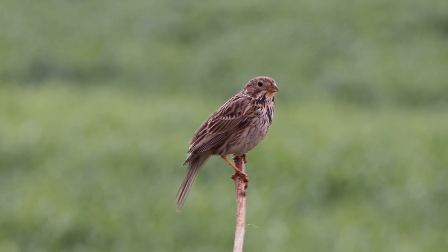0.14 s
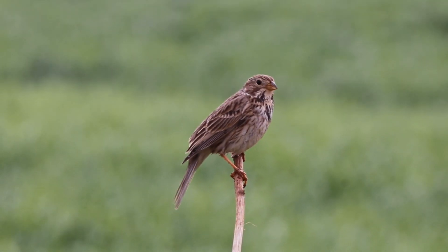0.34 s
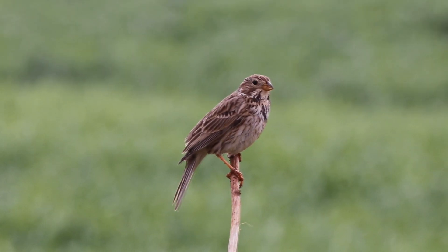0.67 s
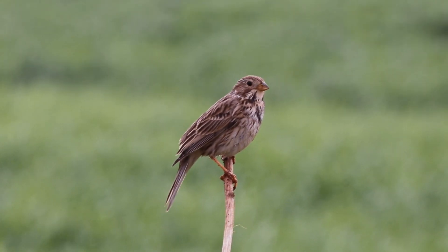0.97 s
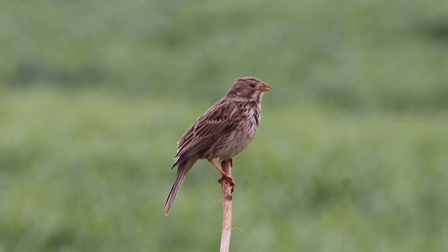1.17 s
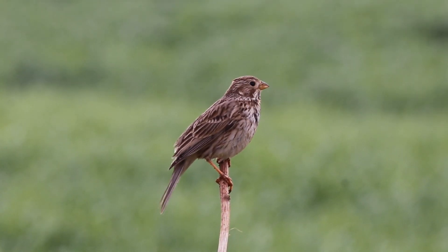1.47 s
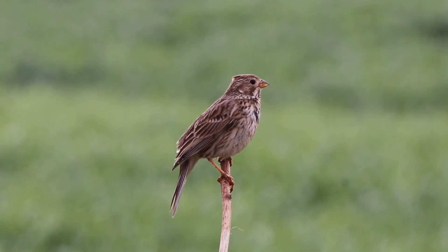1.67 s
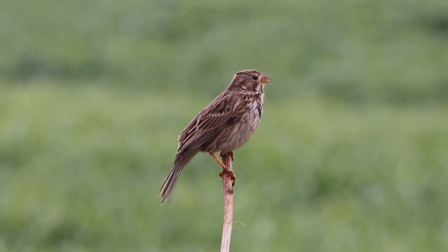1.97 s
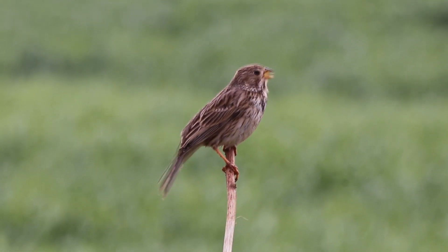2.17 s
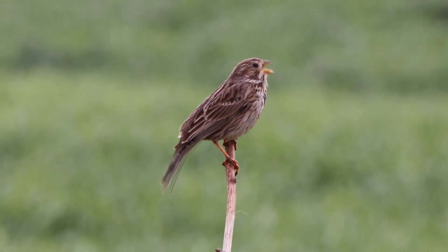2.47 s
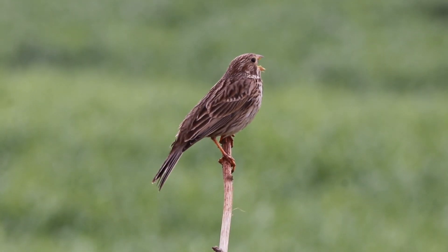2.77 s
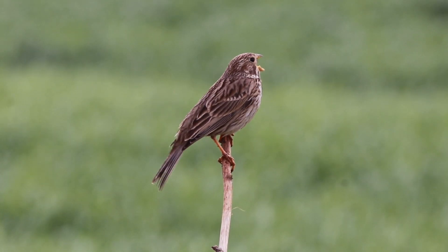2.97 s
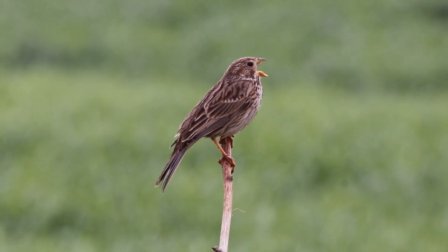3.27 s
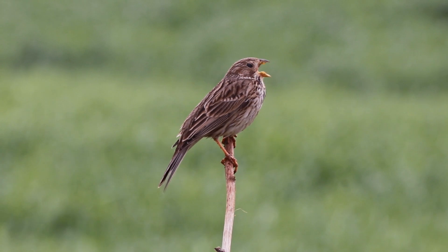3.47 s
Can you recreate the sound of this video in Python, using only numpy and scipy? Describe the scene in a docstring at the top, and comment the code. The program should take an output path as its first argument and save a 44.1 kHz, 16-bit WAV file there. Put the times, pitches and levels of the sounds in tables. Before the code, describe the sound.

A small songbird sings in a field, starting about halfway through with thin chips that quicken into a jangling rattle. Before and beneath it are soft even ticks, a low idling engine, a fading distant rush and light wind.

```python
"""A corn bunting sings from a stalk in an open field: sharp chips speed up into zigzag notes, a trill
and a jangle. Both sides of its voice box (the syrinx) whistle at once, each on its own pitch, and the
field scatters a faint echo. Behind it an engine idles, a distant rush fades, a small mechanism ticks
evenly and wind nudges the microphone."""
import sys
import numpy as np
from scipy import signal
from scipy.fft import rfft, irfft
from scipy.io import wavfile
from scipy.ndimage import uniform_filter1d

SR = 44100
rng = np.random.default_rng(int(sys.argv[2]) if len(sys.argv) > 2 else 0)


def master_out(mix):
    """Clip the mix to full scale and print it as 16-bit PCM to the path in sys.argv[1]."""
    frames = np.transpose(np.atleast_2d(mix))
    ceiling = np.clip(frames, -1, 1)
    pcm = np.round(ceiling * 32767).astype(np.int16)
    wavfile.write(sys.argv[1], SR, pcm)


N = 159642
BASS_PAN_DB, TREBLE_PAN_DB = 6, 4.5  # the background leans to the left


def undb(db):
    """Turn decibels into a number to multiply a sound by."""
    return 10 ** (np.asarray(db) / 20)


def add(out, start, x):
    """Mix a short sound in at its start time in seconds."""
    i = int(start * SR)
    out[i:i + len(x)] += x[:max(len(out) - i, 0)]


def pan(x, db):
    """Make a sound db louder on the left than on the right."""
    return x * undb(np.array([[db], [-db]]) / 2)


def sine(hz):
    """A pure tone that follows a changing pitch."""
    return np.sin(2 * np.pi * np.cumsum(hz) / SR)


def wander(rate, size):
    """A random drift, mostly within -1 to 1, that finds a new value rate times a second."""
    points = rng.standard_normal(1024)
    return np.interp(np.arange(size) * rate / SR, np.arange(len(points)), points)


def noise(colour):
    """Noise of strength 1, shaped by rows of frequency in Hz and relative level in dB."""
    hz, db = np.array(colour, float).T
    f = np.maximum(np.arange(N // 2 + 1) * SR / N, 1)
    gain = undb(np.interp(np.log(f), np.log(hz), db))
    x = irfft(rfft(rng.standard_normal(N)) * gain, N)
    return x / x.std()


def outdoor(colour, half_alike_hz=1110):
    """Stereo noise: left and right are alike in the bass and unrelated in the treble."""
    f = np.arange(N // 2 + 1) * SR / N
    alike = 1 / (1 + (f / half_alike_hz) ** 2)
    mid = rfft(noise(colour))
    side = rfft(noise(colour)) * np.sqrt((1 - alike) / (1 + alike))
    lean_db = (TREBLE_PAN_DB + (BASS_PAN_DB - TREBLE_PAN_DB) * alike) / 2
    return irfft(np.array([(mid + side) * undb(lean_db), (mid - side) * undb(-lean_db)]), N)


# The tone of the air, the far rush and the wind. Each row: frequency in Hz, relative level in dB.
AIR_COLOUR = [(40, -5.5), (100, -5.5), (260, -5.5), (380, -2.5), (480, -9), (700, -11.5), (930, -10),
              (1450, -17.5), (1800, -19.5), (2400, -20.5), (4000, -29), (6800, -33.5), (10000, -37.5),
              (15500, -44.5)]
RUSH_COLOUR = [(300, -27.5), (600, -4.5), (880, 1.5), (1150, -5.5), (1450, -13.5), (1700, -10.5),
               (2400, -35), (5000, -54.5)]
WIND_COLOUR = [(20, -3), (55, 0.5), (140, -9), (250, -15), (600, -59)]
# How the rush dies away. Each row: time in seconds, level in dB.
RUSH_FADE = [(0, -44), (.25, -46), (.7, -47.5), (1.4, -53), (2.1, -54.5), (2.8, -60), (3.6, -79)]
# Puffs of wind. Each row: time of the peak in seconds, fade time in seconds, level in dB.
WIND_PUFFS = [(0.908, 0.05, -43.5), (1.14, .03, -47.5), (3.49, .025, -48)]

def field():
    """Nearly steady air, a far rush that dies away, and puffs of wind on the microphone."""
    t = np.arange(N) / SR
    air = undb(-50 - 0.12 * (t - t.mean()))
    rush = undb(np.interp(t, *np.array(RUSH_FADE).T) + 1.33 * wander(12.25, N))
    puffs = sum(undb(db) * np.exp(-((t - at) / fade) ** 2) for at, fade, db in WIND_PUFFS)
    return air * outdoor(AIR_COLOUR) + rush * outdoor(RUSH_COLOUR) + puffs * outdoor(WIND_COLOUR)


# The engine's low tones. Each row: multiple of the idle speed, level in dB.
IDLE_TONES = [(1, -54.5), (2, -48.5), (3, -54.5), (4, -63), (5, -60)]
# Its higher hums. Each row: pitch in Hz, level in dB.
ENGINE_HUMS = [(205, -60.5), (305, -62), (346, -61), (555, -65.5), (912, -65), (1772, -71.5)]

def engine(idle_hz=27.68):
    """An engine turns at a steady low idle, with a few wavering hums above it."""
    turns = np.cumsum(idle_hz * (1 + 0.0025 * wander(3.03, N))) / SR
    idle = sum(undb(db + 0.36 * wander(6.13, N)) * np.sin(2 * np.pi * (k * turns + rng.random()))
               for k, db in IDLE_TONES)
    hums = sum(undb(db + 3.7 * wander(9, N)) * sine(hz + 6 * wander(25.01, N)) for hz, db in ENGINE_HUMS)
    return pan(np.sqrt(2) * (idle + hums), BASS_PAN_DB)


# The ticks. Each row: start in seconds, relative levels of the click and the knock in dB.
TICK_BEATS = [(0.227, -41.5, -39), (0.6324, -40.5, -45.5), (1.0308, -39, -39.5), (1.4327, -42, -45.5),
              (1.8273, -37, -38.5), (2.2257, -40.5, -40.5), (2.6306, -39, -41), (3.034, -40, -42.5),
              (3.4284, -39.5, -40)]
# The tone of the click. Each row: frequency in Hz, relative level in dB.
CLICK_COLOUR = [(600, -10.5), (1700, -11), (2600, -8.5), (3300, -12), (4700, -5), (6000, -14.5),
                (8200, -16), (10000, -42), (15000, -43)]

def mechanism(rise_s=0.0023, knock_hz=404.6):
    """An even tick-tock: a scratchy click, a brief ring on two pitches in turn and a soft low knock."""
    t = np.arange(SR // 10) / SR

    def strike(rise_s, decay_s):
        return np.minimum(t / rise_s, 1) * np.exp(-np.maximum(t - rise_s, 0) / decay_s)

    knock = strike(rise_s=0.0091, decay_s=0.013) * np.sin(2 * np.pi * knock_hz * t)
    clicks, tones = np.zeros(N), np.zeros(N)
    for k, (start, click_db, knock_db) in enumerate(TICK_BEATS):
        ring_hz, ring_db = (4650, -4) if k % 2 else (3750, -12)
        ring = strike(rise_s, decay_s=0.0088) * sine(ring_hz * (1 + 0.07 * wander(930, len(t))))
        add(clicks, start - rise_s / 2, undb(click_db - 3.5) * strike(rise_s, decay_s=0.005))
        add(tones, start, undb(click_db + ring_db) * ring)
        add(tones, start, undb(knock_db + 1) * knock)
    return pan(clicks * noise(CLICK_COLOUR) + tones, db=8.5)


def whistle(length, pitches, db, attack=0.25, release=0.3, swell_db=0, rough=1):
    """One side of the voice box: an unsteady tone gliding through evenly spaced pitches in Hz."""
    progress = np.linspace(0, 1, int(length * SR))
    hz = np.interp(progress, np.linspace(0, 1, len(pitches)), pitches)
    hz *= 1 + rough * 0.021 * wander(1600, len(hz))
    flicker_db = rough * 2.7 * wander(1300, len(hz))
    # Attack and release are the shares of the note spent fading in and out.
    ramp = np.clip(np.minimum(progress / attack, (1 - progress) / release), 0, 1)
    return np.sin(np.pi / 2 * ramp) * undb(db + swell_db * (progress - 0.5) + flicker_db) * sine(hz)


# The opening chips. Each row: start in seconds, upper pitch in Hz, relative level in dB,
# then the tail's length in seconds, pitch in Hz and relative level in dB.
CHIP_NOTES = [(2.111, 7120, -44, 0.015, 3080, -43), (2.3355, 7260, -31, 0.025, 3286, -39),
              (2.509, 7600, -27.5, 0.028, 3245, -41), (2.6563, 7830, -27.5, 0.027, 3314, -40.5),
              (2.796, 7680, -31, 0.029, 3750, -40), (2.8445, 7650, -30.5, 0.0207, 3770, -38.5),
              (2.8905, 7720, -30.5, 0.025, 3810, -39.5), (2.935, 7580, -29.5, 0.021, 3840, -41.5)]
# How the tail rises, as multiples of its pitch.
TAIL_BEND = [.8, .92, .985, 1.005, 1.008, 1.02]

def chips():
    """Two voices make a sharp click, then a soft low tail rises while the octave above it fades."""
    upper_bend = np.array([1.034, 1.004, 0.97, 0.898, 0.77])
    lower_hz = [5000, 5560, 4500, 5370, 4900]
    out = np.zeros(N)
    for start, hz, db, length, tail_hz, tail_db in CHIP_NOTES:
        upper = whistle(0.008, hz * upper_bend, db - 2, attack=0.45, release=0.19, swell_db=4)
        lower = whistle(0.0082, lower_hz, db - 9.5, attack=0.29, release=0.24, swell_db=13)
        glide = tail_hz * np.array(TAIL_BEND)
        tail = whistle(length, glide, tail_db - 0.5, attack=0.68, release=0.43, rough=0.29)
        octave = whistle(length, 2 * glide, tail_db - 6.5, 0.18, 0.1, swell_db=-15, rough=0.4)
        add(out, start, upper)
        add(out, start + 0.0016, lower)
        add(out, start + 0.012, tail + octave)
    return out


# Faint overtones of the trill's lower voice. Each row: multiple of its pitch, level in dB.
LOWER_OVERTONES = [(2, -64), (3, -64)]

def trill(start=3.047, length=0.14, period_s=0.01222):
    """The lower voice ripples on a sinking pitch; the upper joins at each crest and beats against it."""
    t = np.arange(int(length * SR)) / SR

    def crests(first_s):
        return (0.5 + 0.5 * np.cos(2 * np.pi * (t - first_s) / period_s)) ** 2

    lower_crests, upper_crests = crests(0.0066), crests(0.0052)
    lower_hz = 4673 + 610 * np.exp(-t / 0.023) + 505 * lower_crests
    upper_hz = 5480 + 720 * upper_crests
    lower = whistle(length, lower_hz, db=-35, attack=0.043, release=0.068, swell_db=-2, rough=0.33)
    for k, db in LOWER_OVERTONES:
        lower += whistle(length, k * lower_hz, db, attack=0.2, release=0.06, rough=0.2)
    upper = whistle(length, upper_hz, db=-37, attack=0.03, release=0.05, swell_db=-2)
    out = np.zeros(N)
    add(out, start, lower * (1 + 0.54 * lower_crests) + upper * upper_crests)
    return out


# Zigzag notes, and forked notes where the two voices part. Each row: start in seconds,
# length in seconds, upper pitch in Hz, relative levels of the upper and lower voice in dB.
ZIGZAG_NOTES = [(2.973, 0.014, 7500, -33.5, -40), (2.998, 0.013, 7500, -31, -40),
                (3.0123, 0.0097, 7750, -32, -33), (3.0245, 0.0095, 7500, -31.5, -38)]
FORK_NOTES = [(3.187, 0.011, 7310, -33.5, -37), (3.247, 0.011, 7470, -34, -34),
              (3.263, 0.0091, 7460, -33.5, -34), (3.3157, 0.0075, 7560, -29, -30),
              (3.3668, 0.009, 7450, -33, -31), (3.38, 0.01, 7600, -30.5, -40),
              (3.4025, 0.0095, 7490, -32.5, -30.5), (3.472, 0.0068, 7860, -27, -32),
              (3.4956, 0.005, 7050, -29, -32), (3.5028, 0.0062, 7700, -29.5, -35),
              (3.5095, 0.0067, 7660, -31.5, -33), (3.517, 0.0069, 7500, -29, -37),
              (3.584, 0.0061, 7680, -26.5, -46), (3.594, 0.0078, 7700, -30.5, -59),
              (3.606, 0.0074, 7750, -25.5, -36)]
# Quick pips. Each row: start in seconds, relative levels of the upper and lower voice in dB.
PIP_NOTES = [(3.2, -34, -38), (3.2052, -35, -36), (3.2106, -36, -37), (3.2167, -34, -35),
             (3.2226, -32, -30), (3.29, -28, -29), (3.296, -31, -32), (3.3017, -32, -29),
             (3.3075, -30, -31), (3.4128, -32, -33), (3.418, -33, -33), (3.423, -30, -35),
             (3.427, -38, -33), (3.4305, -33, -34), (3.435, -30, -29), (3.439, -36, -30)]
# One-voice slides. Each row: start and length in seconds, first and last pitch in Hz, level in dB.
SLIDE_NOTES = [(3.23, 0.011, 6440, 5200, -34.5), (3.239, .0035, 7300, 4970, -36),
               (3.241, 0.0075, 6700, 5020, -29), (3.314, .004, 4940, 7200, -34),
               (3.3595, .0035, 7000, 5200, -32), (3.36, 0.0087, 6770, 4890, -24.5),
               (3.392, 0.0045, 7340, 5000, -39), (3.396, 0.0047, 6520, 5250, -30),
               (3.442, 0.0059, 7650, 5060, -25), (3.467, .009, 6900, 6740, -29),
               (3.494, 0.0054, 6760, 7000, -41), (3.523, 0.0067, 5040, 7960, -30),
               (3.527, 0.0063, 7370, 5400, -27.5), (3.542, 0.0065, 7230, 7900, -37)]
# Swelling buzzes. Each row: start in seconds, length in seconds, relative level in dB.
BUZZ_NOTES = [(3.276, 0.012, -29), (3.331, 0.03, -28.5), (3.446, 0.0168, -28.5), (3.533, 0.013, -29)]

def jangle():
    """Tiny zigzags, forks, pips, slides and buzzes tumble out of the voice box."""
    out = np.zeros(N)
    bend, lower_hz = np.array([1, 1.04, 0.94, 1.063, 1.01]), [6200, 5600, 5250]
    for start, length, hz, upper_db, lower_db in ZIGZAG_NOTES:
        add(out, start, whistle(length, hz * bend, upper_db - 1.5, attack=0.35, release=0.18))
        add(out, start + length / 5, whistle(length / 2, lower_hz, lower_db - 1.5))

    bend, lower_hz = np.array([0.9, 0.98, 1.01, 1.03]), [6270, 5680, 5520, 5400]
    for start, length, hz, upper_db, lower_db in FORK_NOTES:
        add(out, start, whistle(length, hz * bend, upper_db - 2, attack=0.49, release=0.18))
        add(out, start, whistle(length, lower_hz, lower_db - 2.5, attack=0.4, release=0.62))

    length, upper_hz, lower_hz = 0.0046, [6300, 7080, 8040, 7700], [5000, 5320, 5300, 5460]
    for start, upper_db, lower_db in PIP_NOTES:
        add(out, start, whistle(length, upper_hz, upper_db - 1, attack=0.62, release=0.42))
        add(out, start, whistle(length, lower_hz, lower_db - 2.5, attack=0.62, release=0.57))

    for start, length, from_hz, to_hz, db in SLIDE_NOTES:
        add(out, start, whistle(length, np.geomspace(from_hz, to_hz, 3), db, attack=0.62, release=0.45))

    upper_hz, lower_hz = [6240, 6290, 6450, 6500, 5660], [5350, 5340, 5620, 5790, 5250]
    for start, length, db in BUZZ_NOTES:
        add(out, start, whistle(length, lower_hz, db - 4.25, attack=0.16, release=0.34, swell_db=17))
        add(out, start, whistle(length, upper_hz, db - 8.75, attack=0.16, release=0.34, swell_db=17))
    return out


def field_echo(sound):
    """Grass and ground scatter the sound into a short near echo and a longer far one."""
    t = np.arange(SR // 2) / SR
    scatter = 0
    for db, fade_s in ((-9.5, 0.082), (-17, 0.3)):
        tail = rng.standard_normal((2, len(t))) * undb(-60 * t / fade_s) * (t > 0.001)
        scatter += undb(db) * tail / np.sqrt(np.sum(tail[0] ** 2))
    return signal.fftconvolve(sound, scatter, axes=1)[:, :N]


# The tone of the rasp that rides on the notes. Each row: frequency in Hz, relative level in dB.
RASP_COLOUR = [(2000, -14), (4500, -14), (7500, 8), (9000, 2.5), (10500, -4.5), (13000, 3.5), (16000, -11)]

def bird(overtones_above_hz=11500):
    """The whole song and its echo; the two voices mix into faint overtones and a rasp."""
    harsh, smooth = chips() + jangle(), trill()
    drive = harsh + undb(-6) * smooth  # the trill rasps less
    loudness = np.sqrt(np.abs(uniform_filter1d(drive ** 2, size=32)))
    mixed = undb(-19.5) * drive ** 2 / (loudness + 0.0085)  # squaring doubles and adds the pitches
    high_pass = signal.butter(4, overtones_above_hz, "high", fs=SR, output="sos")
    overtones = signal.sosfilt(high_pass, mixed)
    rasp = undb(-22) * loudness * noise(RASP_COLOUR)
    song = pan(harsh + smooth, db=4) + pan(overtones + rasp, db=8)
    return song + field_echo(song)


def scene():
    """The bird in front of the field's quiet sounds."""
    return bird() + mechanism() + engine() + field()


def record(dry):
    """The recorder cuts off the highest treble."""
    top_hz = 15900
    return signal.sosfilt(signal.ellip(10, 0.2, 70, top_hz, fs=SR, output="sos"), dry)


dry = scene()
out = record(dry)
master_out(out)
```